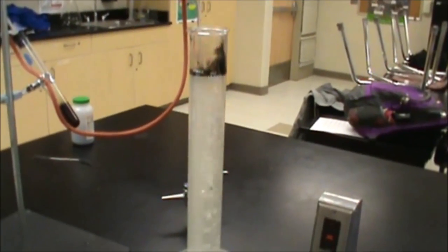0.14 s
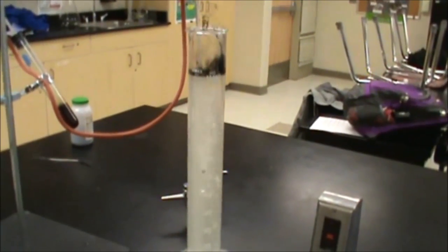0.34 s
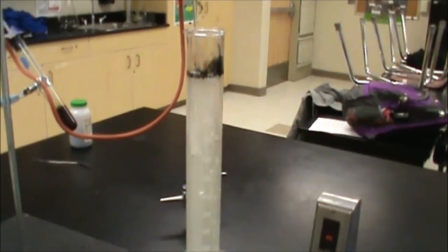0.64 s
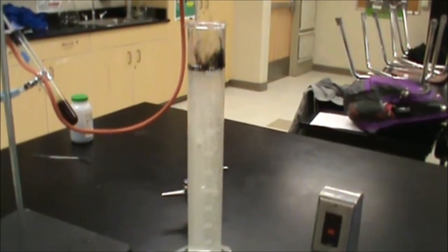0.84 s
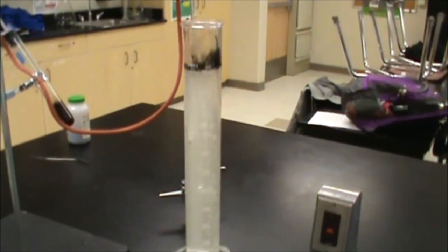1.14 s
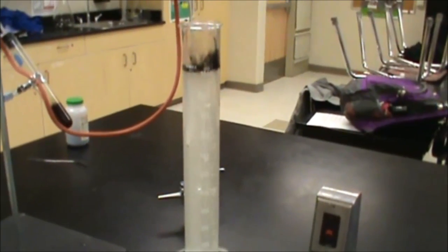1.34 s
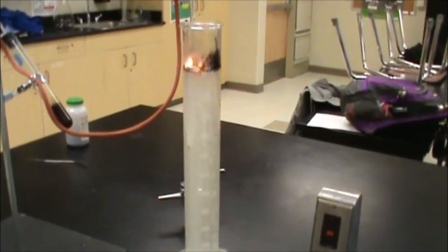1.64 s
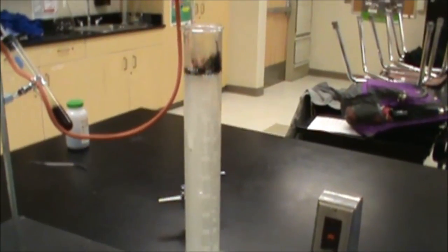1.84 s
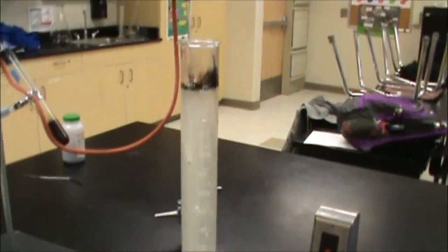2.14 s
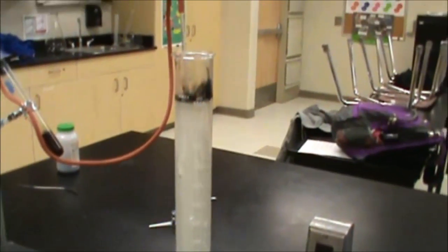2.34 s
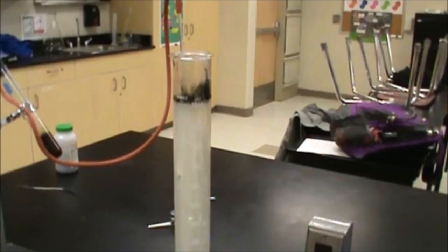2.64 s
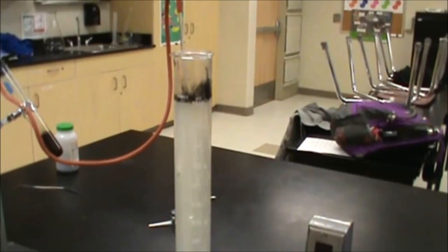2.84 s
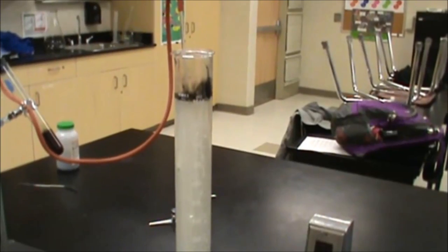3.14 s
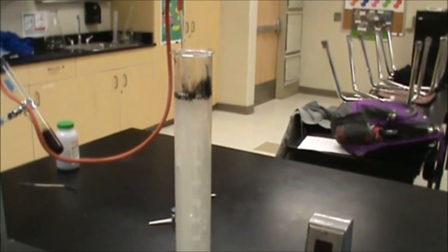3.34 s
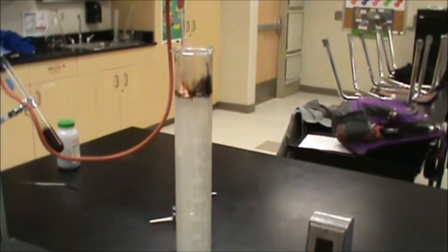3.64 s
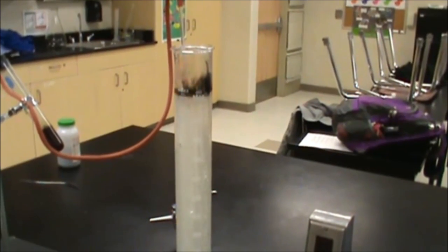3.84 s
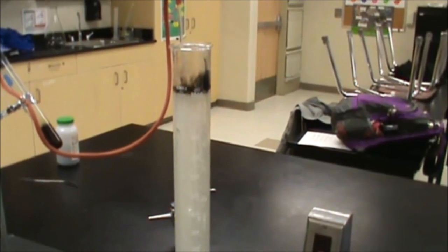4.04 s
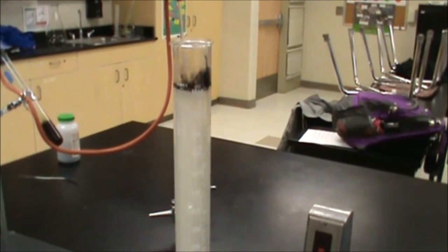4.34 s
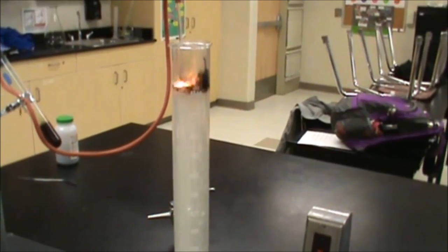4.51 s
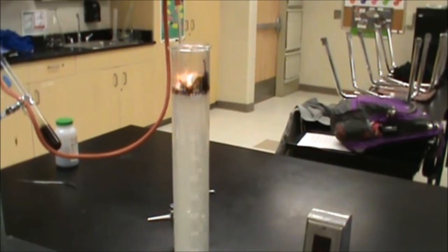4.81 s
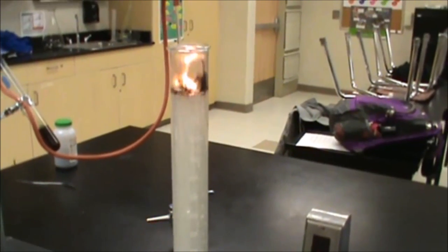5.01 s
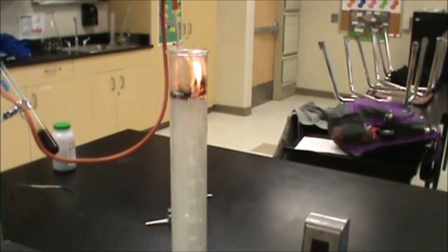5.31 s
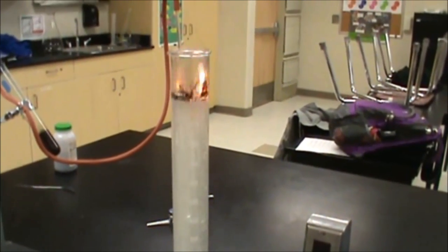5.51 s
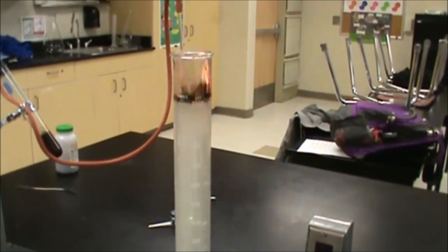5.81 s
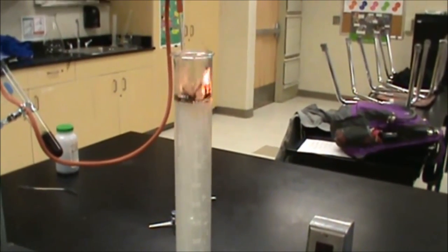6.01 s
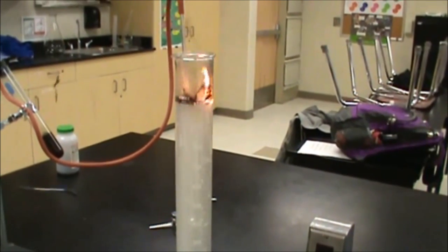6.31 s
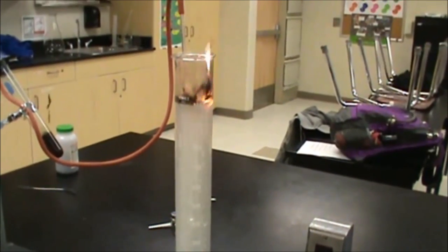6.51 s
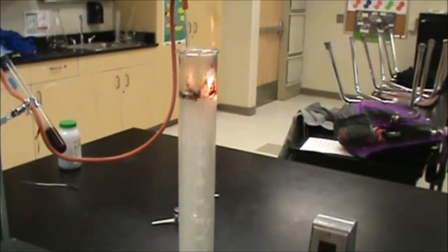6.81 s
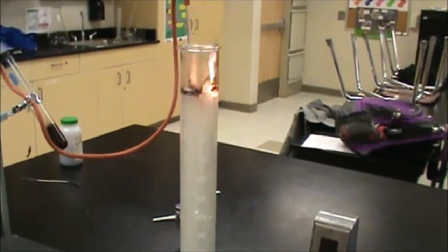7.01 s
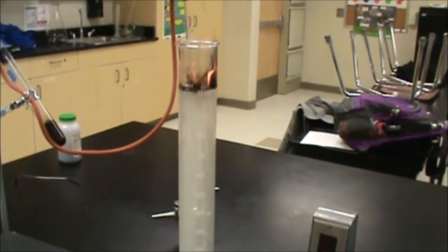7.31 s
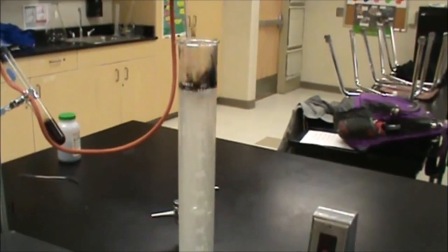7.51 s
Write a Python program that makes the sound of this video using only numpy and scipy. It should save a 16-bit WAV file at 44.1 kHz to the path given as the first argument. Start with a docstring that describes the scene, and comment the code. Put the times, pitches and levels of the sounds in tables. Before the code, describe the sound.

A quiet laboratory with hard walls, heard in stereo from near a tall glass cylinder. Grainy, bright water fizz and soft low ventilation hum run throughout. Igniting bubbles make millisecond-short hollow pops, mostly pitched 600 to 1100 hertz, with a short ringing room tail. A snappy pop opens the clip; others come at 0.4, 0.8 and 1.05, a stronger double near 1.55, and lighter ones until 2.5, including a sharp click there. A lull holds only faint sprays until 3.3. From 3.5 to 4.0 a loud, bright cluster cracks and sprays, ending with a small glass ping. After a pause, pops resume at 4.5 and become frequent and irregular. A barely audible thin whistle sinks around 5; the strongest hits land near 5.3, 6.15 and 7.1, among clicks, thumps, faint crackle and glassy pings, with pops continuing to about 7.5.

```python
"""Gas bubbles catch fire as they break the water surface in a tall glass cylinder, in a quiet laboratory. From
the start the water fizzes over a low steady hum (banded noise), with a few scattered flashes. Each flash rings
the air column above the water, blunt ones thump; noise bursts make sprays and sharp clicks. After a lull near 3
s comes a strong cluster to 4 s; sine pings of glass sound from about 4 s on. From 4.5 s flashes come often, a
faint sine whistle sinks around 5 s; hard walls answer every pop."""
import sys
import numpy as np
from scipy import signal
from scipy.io import wavfile

SR = 44100
rng = np.random.default_rng(int(sys.argv[2]) if len(sys.argv) > 2 else 0)


def gain_from_db(level_db):
    """Turn a decibel level (scalar or array-like) into a linear amplitude factor."""
    decades = np.asarray(level_db, float) / 20
    return 10 ** decades


def store_wav(level_fs):
    """Save 16-bit WAV to argv[1]."""
    pcm = np.round(np.clip(np.atleast_2d(level_fs), -1, 1) * 32767)
    wavfile.write(sys.argv[1], SR, pcm.T.astype(np.int16))


N = 337799


def rms_one(x):
    """Scale to rms 1."""
    return x / np.sqrt(np.mean(x ** 2) + 1e-20)


def peak_one(x):
    """Scale to peak 1."""
    return x / (np.abs(x).max() + 1e-20)


def at_hz(points, hz):
    """Read a table between its points, on a log-frequency axis."""
    table_hz, value = np.array(points).T
    return np.interp(np.log(hz), np.log(table_hz), value)


def band(x, low_hz, high_hz):
    """Keep the sound between two frequencies (Butterworth band-pass)."""
    edges_hz = [low_hz, min(high_hz, .45 * SR)]
    return signal.sosfilt(signal.butter(2, edges_hz, "band", fs=SR, output="sos"), x)


def resonate(x, hz, width_hz):
    """One resonance, gain 1 on top; a narrow one rings longer."""
    r = np.exp(-np.pi * width_hz / SR)
    feedback = [1, -2 * r * np.cos(2 * np.pi * hz / SR), r * r]
    return signal.lfilter([(1 - r * r) / 2, 0, (r * r - 1) / 2], feedback, x)


def drift(rate_hz):
    """Slow random wander of spread 1: low-passed noise, made at every 40th sample."""
    r = np.exp(-80 * np.pi * rate_hz / SR)
    slow = signal.lfilter([1], [1, -2 * r, r * r], rng.standard_normal(N // 40 + 2002))
    slow = slow[2000:]    # leave out the filter's settling
    return np.interp(np.arange(N) / 40, np.arange(len(slow)), rms_one(slow - slow.mean()))


def burst(sound, length_ms):
    """A sound that flares up fast and dies away."""
    x = np.arange(len(sound)) / SR / (max(length_ms, .3) / 1000)
    return sound * np.sqrt(x) * np.exp(-x * 2.15)


def add(track, s, sound):
    """Mix a sound in at time s."""
    i = max(round(s * SR), 0)
    track[i:i + len(sound)] += sound[:N - i]


THUMP_DB = -13    # thump against the flash level at sharpness 0; it falls dB for dB with sharpness

# burning bubbles: t/s, level/dB, sharpness/dB, air column f/Hz, burn time/ms
# a sharp flash rings the upper pipe tone, a blunt one thumps
FLASHES = [(0.0216, -17, 9.5, 840, 3.4), (0.055, -31, -11, 810, 6), (0.074, -30.5, 14, 1150, 8.5),
           (0.1237, -26, 14, 1250, 0.96), (0.4008, -14.5, 18.5, 1070, 6.9), (0.403, -22, 13, 610, 10),
           (0.45, -37, -7, 604, 10), (0.8034, -25.5, 5.5, 718, 19), (0.812, -31, 6, 870, 7.9),
           (0.851, -27, 4, 840, 13), (0.858, -33, 0, 674, 7.1), (1.0518, -16, 7, 828, 8.1),
           (1.053, -26, 8, 573, 17), (1.062, -22.5, 7, 917, 29), (1.114, -26, 11, 817, 13),
           (1.3546, -35.5, -8, 584, 7.8), (1.357, -40.5, 4, 1150, 21), (1.5422, -17, -18.5, 655, 2.7),
           (1.547, -12, 4, 945, 12), (1.628, -28, 8, 720, 9.4), (1.722, -32, 16, 830, 21),
           (1.8236, -25.5, -2, 750, 1.3), (1.851, -18.5, 2, 743, 3.5), (1.923, -29, -12.5, 810, 2.8),
           (1.971, -27, -7, 960, 3.4), (2.079, -27.5, -4, 840, 0.91), (2.09, -30.5, -11, 700, 1.2),
           (2.153, -18, -2, 850, 1.2), (2.2679, -15, 3.5, 960, 2.5), (2.5073, -17, 11, 900, 2.8),
           (2.509, -32.5, 2, 564, 3.2), (3.285, -15.5, 11.5, 840, 2.3), (3.287, -30.5, 1, 553, 6),
           (3.3, -30.5, 13, 896, 25), (3.4007, -22, 8.5, 860, 3.7), (3.511, -11, 18, 860, 5.2),
           (3.512, -21.5, 9, 577, 4.8), (3.513, -24, 19, 2150, 4.9), (3.5586, -9, 5, 806, 2.3),
           (3.5612, -16.5, -16.5, 654, 5.6), (3.568, -8.5, 9, 880, 17), (3.713, -21, 13, 644, 6.4),
           (3.835, -28, 6.5, 790, 1.6), (3.878, -24, -7.5, 760, 3.6), (3.901, -10, 9, 770, 0.18),
           (3.925, -12, 20, 1150, 3.6), (3.93, -24, 16, 1860, 4.9), (3.942, -21, 6, 1840, 4.4),
           (3.955, -17.5, 5, 1110, 8.1), (3.97, -28, 12, 1826, 19), (4.005, -29.5, 15, 1150, 42),
           (4.504, -23, -13, 653, 14.4), (4.5135, -10, 6, 625, 2.9), (4.517, -17.5, -17, 980, 4.7),
           (4.548, -21, 10, 1080, 11), (4.59, -30, -8, 694, 17), (4.828, -30, 15, 1000, 5),
           (4.8772, -21, -2.5, 604, 1.9), (4.9947, -20.5, 2, 820, 1.5), (5.112, -17, 3, 866, 0.5),
           (5.1453, -28, -3, 1145, 7.8), (5.1825, -21, 1, 850, 1.2), (5.2202, -18.5, 10, 830, 0.41),
           (5.261, -10, -2, 1080, 1.6), (5.296, -5.5, 1.5, 1085, 2.6), (5.313, -23.5, 6, 1075, 26),
           (5.4686, -13.5, -3, 1020, 0.34), (5.4821, -21, -7, 760, 10.4), (5.5266, -15, 8, 795, 1.1),
           (5.6519, -24.5, 9, 790, 3), (5.77, -26.5, 12, 905, 5.3), (5.8017, -14, 5.5, 690, 2),
           (5.8334, -15, 5, 940, 0.98), (5.903, -22, -4, 850, 1.7), (5.949, -12.5, -0.5, 590, 1.05),
           (5.953, -15.5, 15, 990, 5.2), (6.0228, -14, 1, 850, 2.2), (6.0774, -22.5, -6, 850, 4.1),
           (6.1248, -25.5, -5, 860, 3.1), (6.157, -5.5, 5, 850, 5.7), (6.171, -18, 8, 867, 7.9),
           (6.1815, -18, -3, 930, 1.5), (6.2373, -19, 11.5, 910, 4.5), (6.3782, -22.5, 14, 870, 8),
           (6.4448, -15, 3, 850, 2.3), (6.4933, -23, 13, 820, 3), (6.583, -24.5, -2, 580, 2.3),
           (6.6899, -21.5, 3, 850, 0.56), (6.737, -27.5, 6, 895, 2.9), (6.797, -18, -1.5, 546, 1),
           (6.812, -24, 6, 600, 1.2), (6.856, -21, 2, 780, 1), (6.868, -20.5, 13, 960, 1.6),
           (6.953, -26, 3, 850, 1.6), (6.9575, -12, 8.5, 860, 1.1), (6.978, -14, 2, 900, 3.5),
           (7.044, -16.5, 8, 830, 0.26), (7.108, -6, 0, 884, 0.48), (7.125, -23, 7, 946, 10),
           (7.146, -18, 1, 984, 4.4), (7.2943, -25, 12, 800, 0.47), (7.3184, -23, 12.5, 805, 4),
           (7.4557, -15.5, 11, 854, 0.9), (7.479, -25.5, 6, 890, 2.6)]


def flashes():
    """The flame pulsates at the air column's pitch and roars a little; its swelling pushes out a low thump."""
    roar = 0.6    # turbulent share beside the clean pulsation, before the part that grows with sharpness
    out, span = np.zeros(N), 4000
    t = np.arange(span) / SR
    for (s, db, sharp_db, hz, burn_ms), noise in zip(FLASHES, rng.standard_normal((len(FLASHES), span))):
        fire = burst(noise, burn_ms)
        upper_db = -36 + 1.866 * sharp_db

        # a fierce or brief flash rings broader
        width_hz = 180.0 + 210.0 * gain_from_db(upper_db) + 72.0 / burn_ms
        pulsing = burst(np.sin(2 * np.pi * hz * t), 0.43 * burn_ms)
        column = peak_one(resonate(pulsing, hz, width_hz))
        column += (roar + 2.3 * gain_from_db(upper_db)) * peak_one(resonate(fire, hz, 1.47 * width_hz))
        # a wide mouth radiates little off resonance
        column = band(column, 0.67 * hz, max(1.17 * hz, 1300.0))
        column = peak_one(band(column, 0.35 * hz, 2.5 * hz))

        upper = 1.25 * resonate(resonate(fire, 1040.0, 430.0), 1230.0, 450.0)
        upper += 1.18 * resonate(resonate(fire, 1880.0, 200.0), 1700.0, 300.0)
        upper = peak_one(band(upper, 820.0, 3260.0))
        add(out, s - .0012, gain_from_db(db - 1.0) * (column + gain_from_db(upper_db + 3.0) * upper))

        # the short bright crack of ignition, stronger in a sharp flash
        crack = peak_one(band(burst(noise, min(burn_ms, 1.5)), 1420.0, 3360.0))
        add(out, s - .0003, gain_from_db(db - 19.5 + 0.22 * sharp_db) * crack)

        # overpressure, then suction: quicker for a brief burn, while a longer burn pushes for longer
        swell_s = 0.00071 + burn_ms / 3500
        push_hz = 133.0 + 130.0 / max(burn_ms, 1)
        push = peak_one(np.sin(2 * np.pi * push_hz * t) * np.sqrt(t) * np.exp(-t / swell_s))
        push += 0.48 * peak_one(band(fire, 228.5, 361.0))
        push += 1.02 * peak_one(resonate(resonate(fire, 526.0, 195.0), 664.0, 430.0))
        push += 0.37 * peak_one(band(fire, 85.5, 155.0))
        push += 0.066 * min(burn_ms, 9.0) * peak_one(band(fire, 42.4, 111.0))
        add(out, s + 0.00046, gain_from_db(db + THUMP_DB - sharp_db) * push)
    return out


def aftermath(db, rise_s, fall_s):
    """Amplitude of a noise that swells after every flash and dies away; powers add."""
    flash_s = np.array(FLASHES)[:, 0]
    age = np.maximum(np.arange(0, N + 64, 64)[:, None] / SR - flash_s, 0)
    power = gain_from_db(2 * db) * (1 - np.exp(-age / rise_s)) * np.exp(-age / fall_s)
    return np.interp(np.arange(N) / 64, np.arange(len(age)), np.sqrt(power.sum(axis=1)))


def flutter():
    """Each thump leaves the flame fluttering: low noise that swells and fades."""
    flash_db, sharp_db = np.transpose(FLASHES)[1:3]
    noise = rms_one(band(rng.standard_normal(N), 90.0, 317.0)) * gain_from_db(drift(28))
    return aftermath(flash_db + THUMP_DB - sharp_db - 23.5, rise_s=0.013, fall_s=0.12) * noise


# short sprays of noise: t/s, level/dB (they peak 8 dB below it), centre f/Hz, length/ms
NOISE_SPRAYS = [(0.022, -22, 2900, 3.8), (0.061, -21, 7600, 44), (0.067, -29, 11700, 36),
                (0.46, -28, 4030, 8), (0.618, -27, 4730, 13), (0.62, -27.5, 2330, 36),
                (0.797, -29.5, 3850, 8.9), (1.223, -32.5, 3900, 16), (1.287, -31, 3500, 10),
                (1.325, -30, 3120, 25), (2.719, -37, 3780, 20), (2.785, -33, 3600, 7.9),
                (3.04, -30.5, 2560, 16), (3.042, -30, 5600, 10), (3.071, -31, 2630, 17),
                (6.691, -28, 3000, 6), (6.868, -30, 2800, 6.8), (1.118, -26, 5300, 9.0),
                (1.284, -20.5, 8400, 11), (1.311, -20, 9800, 4.5), (1.7725, -24, 5500, 10),
                (2.11, -24, 8400, 6.9), (2.266, -23.5, 3880, 19), (3.405, -25, 3430, 5.2),
                (3.882, -20.5, 5500, 12), (3.926, -7, 3770, 2.3), (3.945, -24, 3830, 41),
                (3.925, -11.5, 2660, 2.4), (4.046, -23, 9850, 21), (4.509, -18.5, 4030, 13),
                (4.876, -21.5, 4800, 5.6), (5.111, -27, 4130, 5.4), (5.145, -25, 4070, 10),
                (5.245, -28, 4100, 3.3), (5.2605, -10.5, 4070, 1.3), (5.297, -15, 4030, 6.6),
                (5.331, -27, 4100, 4.2), (5.441, -20, 4940, 6.6), (6.1584, -20, 4070, 5.4),
                (6.215, -21.5, 5500, 33), (6.442, -31, 2430, 5), (6.98, -31, 2800, 8.9),
                (7.105, -27, 4800, 4.4), (7.106, -25, 2870, 4), (7.457, -22.5, 4530, 2.6)]


def sprays():
    """Short sprays of noise, each with its own centre pitch; those near 4 kHz ring glassily."""
    out, span = np.zeros(N), 4000
    noises = rng.standard_normal((len(NOISE_SPRAYS), span))
    for (s, db, hz, length_ms), noise in zip(NOISE_SPRAYS, noises):
        spray = burst(noise, length_ms)
        coloured = resonate(resonate(spray, hz, 0.12 * hz), hz, 0.76 * hz)
        coloured += 0.31 * band(spray, 1900.0, 7900.0)
        add(out, s - .0006, gain_from_db(db - 8.0) * peak_one(coloured))
    return out


# high snaps of small bubbles and lower cracks of flashes:
# t/s, level/dB (clicks peak 0.5 dB above it), centre f/Hz
SHARP_CLICKS = [(0.022, -19, 8100), (0.0735, -25, 8100), (0.0738, -28, 11500), (2.5064, -18, 11200),
                (6.585, -35, 1720), (6.69, -45, 1900), (6.855, -38, 3450), (7.456, -27.5, 2520),
                (0.1234, -24, 7600), (0.406, -28, 4200), (1.5463, -32, 7950), (1.547, -30, 2750),
                (2.507, -18.5, 9100), (3.2843, -15, 8200), (3.5813, -22, 7000), (3.597, -24, 7900),
                (3.562, -28, 2270), (3.9255, -22, 6330), (3.9243, -17, 2730), (3.9256, -24, 4750),
                (4.046, -22.5, 10100), (4.5588, -23, 9000), (5.147, -25, 9800), (5.331, -39, 8030),
                (5.649, -26, 7520), (5.8125, -23, 9000), (5.95, -35, 1980), (6.394, -23.5, 8100),
                (6.4465, -32, 2340), (6.958, -48, 2450), (7.108, -51, 1950)]


def clicks():
    """Sharp clicks of a few cycles of noise: high snaps of small bubbles and lower cracks of flashes."""
    out, span = np.zeros(N), 300
    for (s, db, hz), noise in zip(SHARP_CLICKS, rng.standard_normal((len(SHARP_CLICKS), span))):
        click = peak_one(band(burst(noise, 0.15), 0.81 * hz, 1.235 * hz))
        add(out, s + 0.00042, gain_from_db(db + 0.5) * click)
    return out


# the glass wall pings when a flash slaps it: t/s, level/dB, f/Hz
GLASS_PINGS = [(3.945, -26.5, 3700), (5.298, -27.5, 4020), (6.16, -31.5, 4090), (6.237, -38, 3950),
               (6.446, -36.5, 3860), (6.495, -42, 3830), (6.586, -37.5, 3810), (6.982, -38, 3850),
               (7.046, -36, 3800)]


def pings():
    """A short glassy sine that falls by 60 dB in a few hundredths of a second."""
    t60_s = 0.042
    out, t = np.zeros(N), np.arange(4000) / SR
    for s, db, hz in GLASS_PINGS:
        fade = gain_from_db(db - 60 * t / t60_s) * (1 - np.exp(-t / 0.0027))
        add(out, s, fade * np.sin(2 * np.pi * hz * t))
    return out


# a faint thin whistle that sinks while the flame stands: t/s, f/Hz, level/dB
SINKING_WHISTLE = [(4.8, 4600, -91), (4.899, 4500, -73.5), (5.05, 4250, -54), (5.2, 4120, -60),
                   (5.35, 4020, -69), (5.5, 3880, -85)]


def whistle():
    """A narrow wavering tone: a sine under slowly wandering noise."""
    s, hz, db = np.transpose(SINKING_WHISTLE)
    t = np.arange(N) / SR
    level = gain_from_db(np.interp(t, s, db, left=-200, right=-200))
    sine = np.sin(2 * np.pi * np.cumsum(np.interp(t, s, hz)) / SR)
    return level * np.sqrt(2) * drift(60.0) * sine


# slow changes of two sounds: t/s, calm fizz level/dB, crackle level/dB of the standing flame
SLOW_LEVELS = [(0.0, -43.5, -65), (0.15, -46.5, -80), (0.6, -45.5, -87), (0.95, -48.5, -88),
               (1.3, -43.5, -96), (1.7, -45.5, -44), (2.0, -45, -68), (2.45, -43.5, -57), (2.7, -47, -66),
               (3.3, -46, -79), (3.6, -46, -37), (4.2, -45, -66), (4.7, -44.5, -57), (5.2, -44.5, -49),
               (5.55, -42.5, -43), (5.8, -43.5, -56.5), (6.8, -46, -48), (7.35, -45, -51), (7.66, -44, -60)]


def slow_levels():
    """Amplitudes of the calm fizz and of the crackle, at every sample."""
    s, fizz_db, crackle_db = np.transpose(SLOW_LEVELS)
    t = np.arange(N) / SR
    return gain_from_db(np.interp(t, s, fizz_db)), gain_from_db(np.interp(t, s, crackle_db))


def crackle(per_s):
    """Countless tiny ignitions keep the air column softly ringing; rms 1."""
    sizes = gain_from_db(7.3 * np.minimum(rng.exponential(1, N), 2)) * rng.choice([-1, 1], N)
    ignitions = sizes * (rng.random(N) < per_s / SR) + 1e-18
    return rms_one(band(resonate(ignitions, 900.0, 120.0), 500.0, 3250.0))


# bench top and nearest walls: delay/ms, level/dB
FIRST_ECHOES = [(1.4, -43), (6.0, -9.5), (16.4, -14.5)]


def echoes(x, extra_db=0):
    """The sound itself plus first reflections off flat hard surfaces."""
    out = x.copy()
    for ms, db in FIRST_ECHOES:
        add(out, ms / 1000, gain_from_db(db + extra_db) * x)
    return out


# tones of glass and room that linger after each pop: f/Hz, relative level/dB, time to fall 60 dB/s
LINGERING_TONES = [(144, -17, 0.012), (296, -43, 0.54), (460, -19, 0.038), (552, -12, 1),
                   (660, -16.5, 0.67), (850, -10, 0.74), (945, -5, 0.15), (972, -5, 0.27),
                   (1068, -25, 0.95), (1150, -20.5, 0.62), (1298, -20.5, 0.38), (1730, -24, 0.28),
                   (1820, -17, 0.58), (1866, -9, 0.42), (2720, -11, 0.028), (4070, -4.5, 0.016)]


def lingering(x):
    """Narrow tones set ringing by whatever sounds near their pitch."""
    out = 0
    for k, (hz, db, t60_s) in enumerate(LINGERING_TONES):
        width_hz = np.log(1000) / np.pi / t60_s
        out = out + (-1) ** k * gain_from_db(db) * resonate(x + 1e-18, hz, width_hz)
    return out


# how long the room rings: f/Hz, time to fall 60 dB/s
ROOM_DECAY = [(100, 0.21), (300, 0.46), (800, 0.27), (2000, 0.31), (6000, 0.14)]


def room(x, gap_s=0.00037, width_db=-6.5):
    """Dense reflections: noise dying octave by octave, partly different left and right in bass and middle."""
    t = np.arange(SR // 2 + SR // 4) / SR
    noise, tail = rng.standard_normal((2, len(t))), 0
    for hz in 60 * 2 ** np.arange(8):
        tail = tail + band(noise, hz, 2 * hz) * gain_from_db(-60 * t / at_hz(ROOM_DECAY, hz * np.sqrt(2)))
    tail = tail * (1 - np.exp(-(t / gap_s) ** 2)) / np.sqrt(SR)    # reflections set in after a tiny gap
    mid, side = signal.fftconvolve(x[None], tail, axes=1)[:, :N]
    return mid + gain_from_db(width_db) * band(side, 180.0, 3800.0) * [[1], [-1]]


# how alike left and right are: f/Hz, likeness (1 = same, 0 = unrelated)
LEFT_RIGHT_LIKENESS = [(60, .98), (400, .88), (1300, .55), (2400, .62), (4400, .74), (8000, .87),
                       (15000, .72)]


def banded_noise(spectrum, patchy_db, grain_db):
    """Half-octave bands of grainy stereo noise, each with its own level, flicker and likeness; rms 1."""
    out, together = 0, drift(19.4)
    lowest_hz, highest_hz = spectrum[0][0], spectrum[-1][0]
    edges = lowest_hz * 2 ** np.arange(0, np.log2(highest_hz / lowest_hz) + .4, .5)
    grain = gain_from_db(grain_db * np.minimum(rng.exponential(1, N), 5))
    white = rng.standard_normal((2, 2, N)) * grain
    for k, (low, high) in enumerate(zip(edges, edges[1:])):
        mid, side = band(white[k % 2], low, high)    # neighbouring bands use different noise
        hz = np.sqrt(low * high)
        alike = np.clip(at_hz(LEFT_RIGHT_LIKENESS, hz), -1, 1)
        gain = gain_from_db(at_hz(spectrum, hz) + patchy_db * (0.77 * together + drift(9.1)))
        out = out + gain * (np.sqrt(1 + alike) * mid + np.sqrt(1 - alike) * side * [[1], [-1]])
    return rms_one(out)


# colour of the fizzing water: f/Hz, relative level/dB per Hz
FIZZ_SPECTRUM = [(710, -45), (1200, -5), (1600, -3.5), (2200, -5), (2900, -4), (5000, -4), (8800, -1.5),
                 (11000, -11), (13300, -12), (15500, -12)]


def fizz(calm):
    """The water fizzes as grainy noise; each flash churns it into extra froth for a moment."""
    flash_db = np.array(FLASHES)[:, 1]
    froth = aftermath(flash_db - 37, rise_s=0.0043, fall_s=0.039)
    return np.hypot(calm, froth) * banded_noise(FIZZ_SPECTRUM, patchy_db=1.34, grain_db=3.0)


# colour of the hum: f/Hz, relative level/dB per Hz
HUM_SPECTRUM = [(15, -39), (25, -7.5), (142, 1), (278, -0.5), (371, -0.5), (486, -2), (743, -2.5),
                (1070, -18), (1350, -13), (1510, -18), (2500, -46), (3250, -51), (5500, -120)]


def hum():
    """A steady, mostly low noise floor."""
    return gain_from_db(-50) * banded_noise(HUM_SPECTRUM, patchy_db=1.8, grain_db=0.5)


def scene():
    """Flashes, sprays, clicks and pings in the room, over fizz, flame flutter and hum."""
    calm_fizz, crackle_level = slow_levels()
    pops = flashes() + whistle() + sprays() + pings() + crackle_level * crackle(per_s=200.0)
    sharp = clicks()
    # the short waves of a click reflect more strongly
    heard = echoes(pops) + echoes(sharp, extra_db=3.5)
    heard = heard + gain_from_db(13.5) * lingering(pops + sharp) + gain_from_db(20.0) * room(pops + sharp) + flutter()
    # the left microphone port passes less bass
    heard[0] -= 0.58 * signal.sosfilt(signal.butter(1, 200.0, fs=SR, output="sos"), heard[0])
    return heard + fizz(calm_fizz) + hum()


def band_limit(x):
    """A steep low-pass at the top of the band."""
    return signal.sosfilt(signal.butter(12, 15400, fs=SR, output="sos"), x)


def record(dry):
    """The deepest bass and highest treble are cut, and peaks are gently rounded."""
    dry = signal.sosfilt(signal.butter(1, 45.0, "high", fs=SR, output="sos"), dry)
    dry = signal.sosfilt(signal.cheby2(10, 60, 16000, fs=SR, output="sos"), dry)
    mix = 1.22 * np.tanh(dry / 1.198)
    return band_limit(mix)


dry = scene()
out = record(dry)
store_wav(out)
```